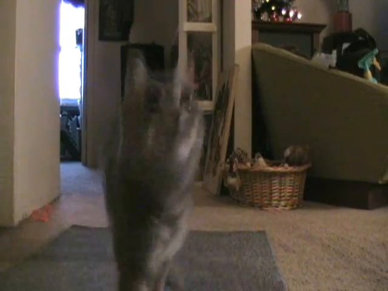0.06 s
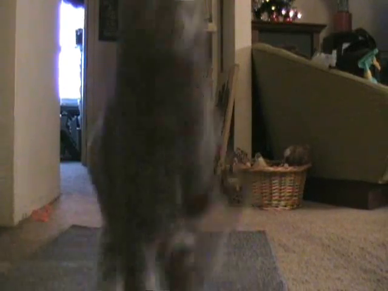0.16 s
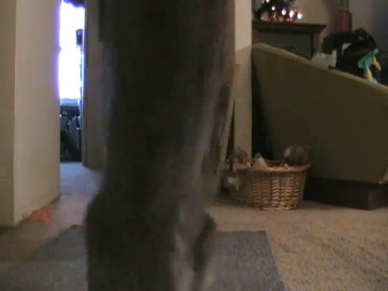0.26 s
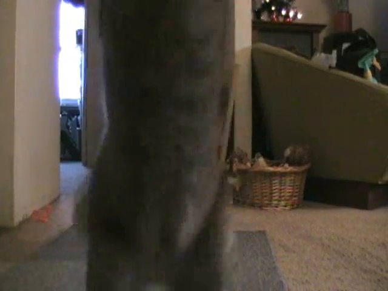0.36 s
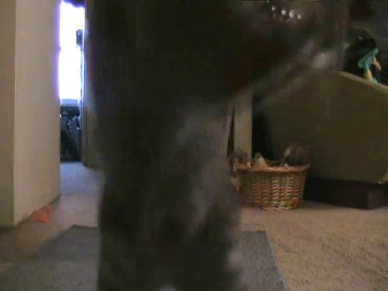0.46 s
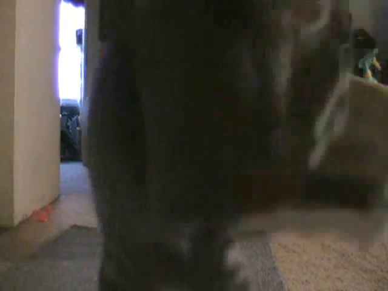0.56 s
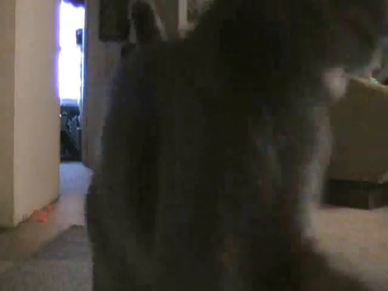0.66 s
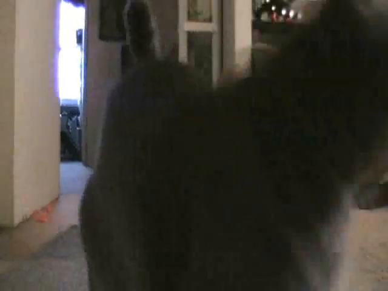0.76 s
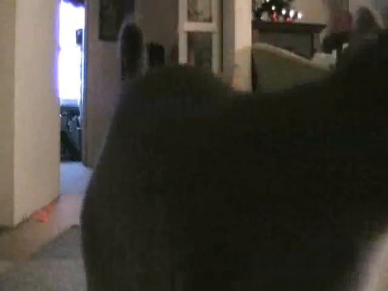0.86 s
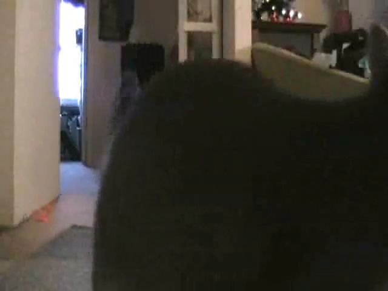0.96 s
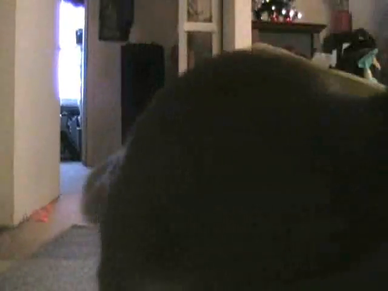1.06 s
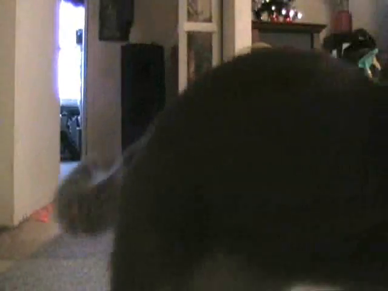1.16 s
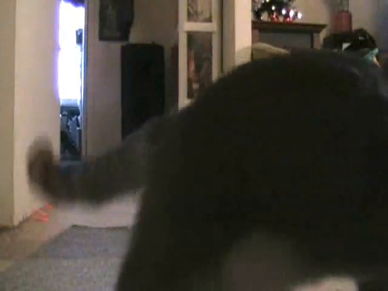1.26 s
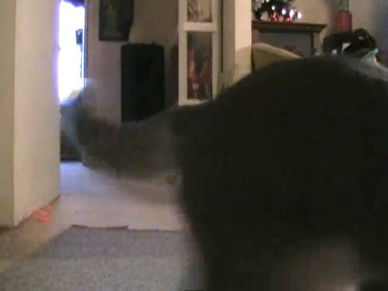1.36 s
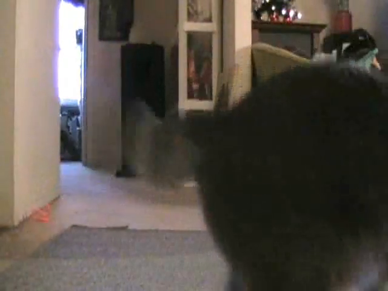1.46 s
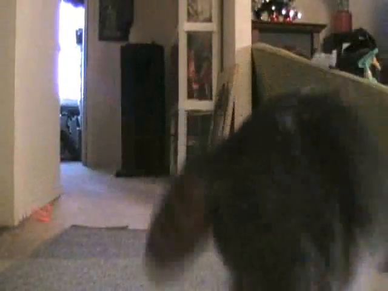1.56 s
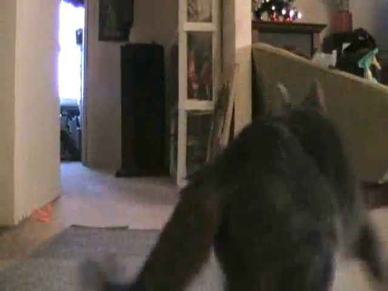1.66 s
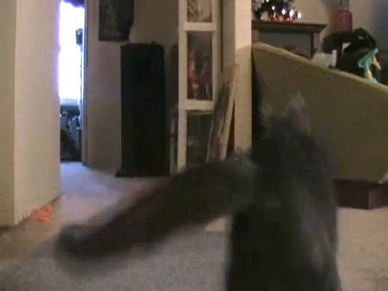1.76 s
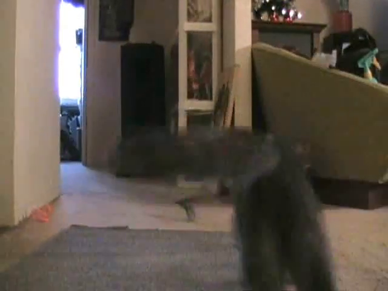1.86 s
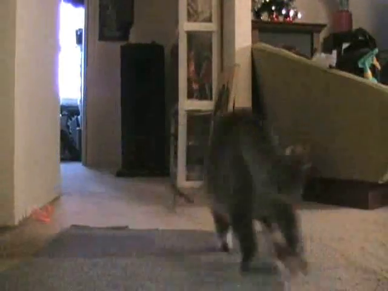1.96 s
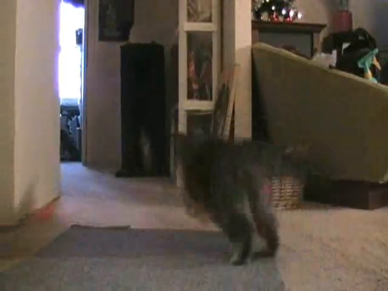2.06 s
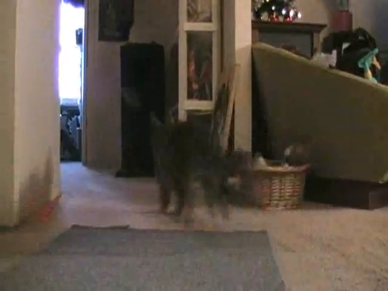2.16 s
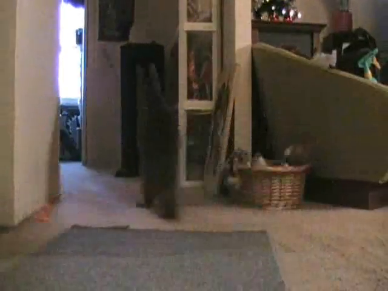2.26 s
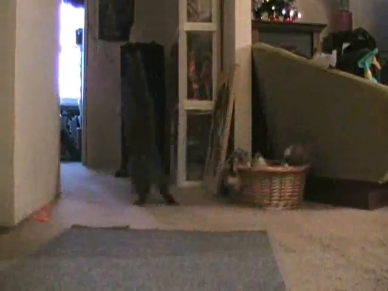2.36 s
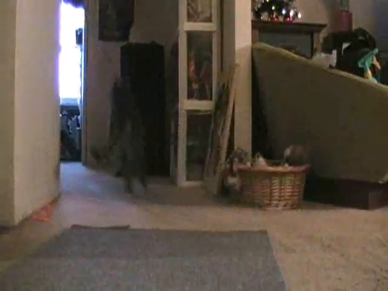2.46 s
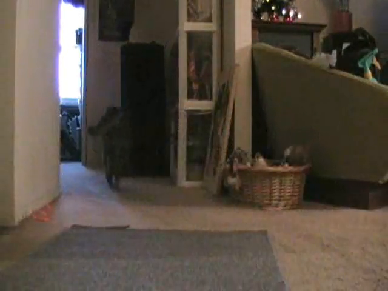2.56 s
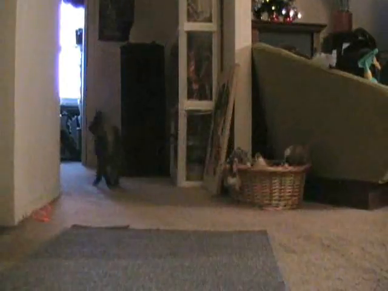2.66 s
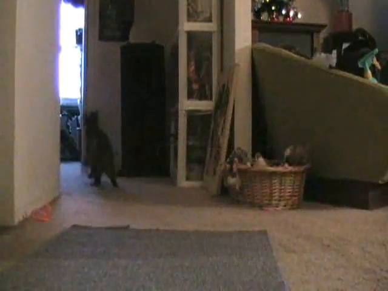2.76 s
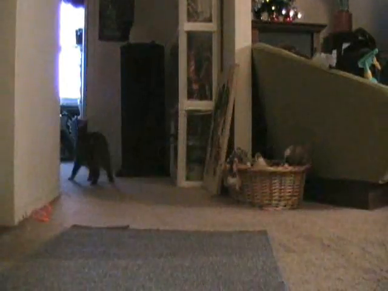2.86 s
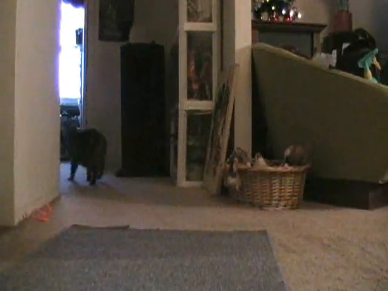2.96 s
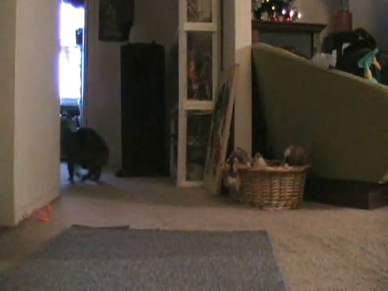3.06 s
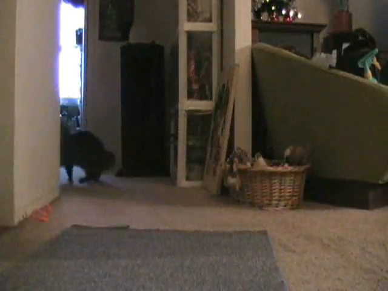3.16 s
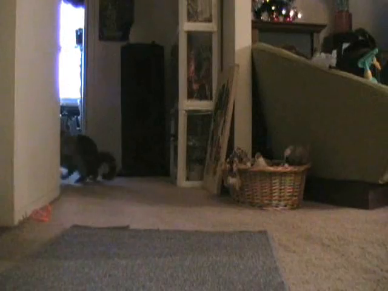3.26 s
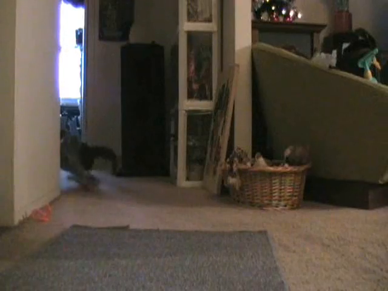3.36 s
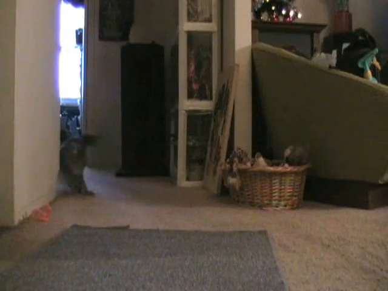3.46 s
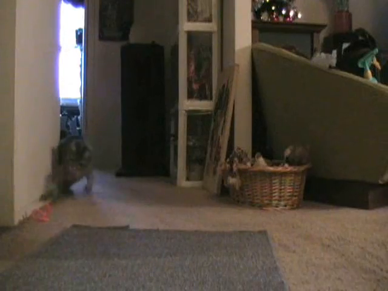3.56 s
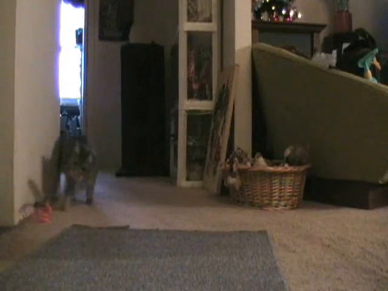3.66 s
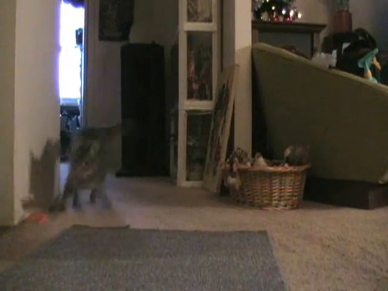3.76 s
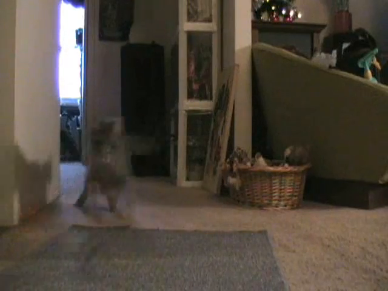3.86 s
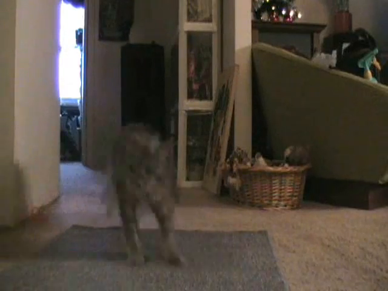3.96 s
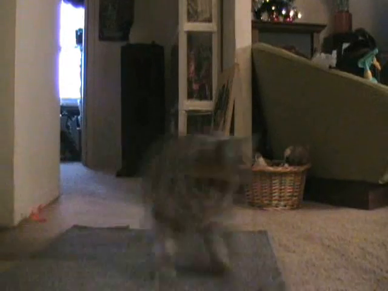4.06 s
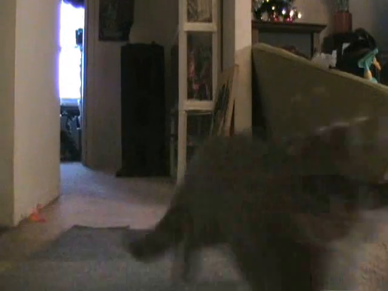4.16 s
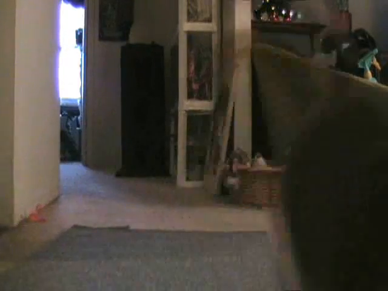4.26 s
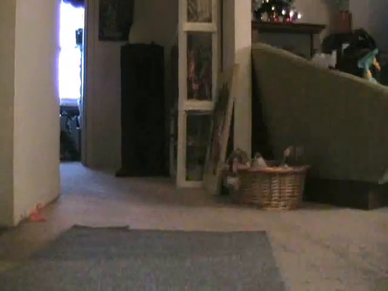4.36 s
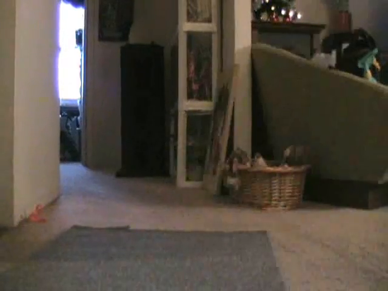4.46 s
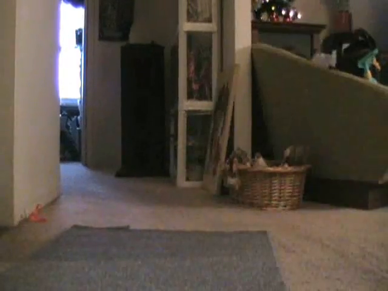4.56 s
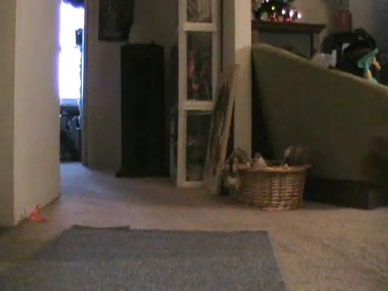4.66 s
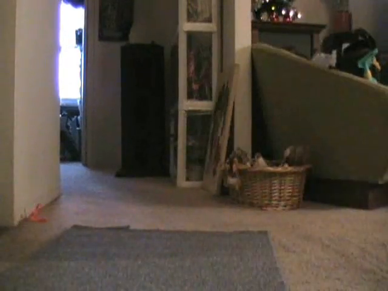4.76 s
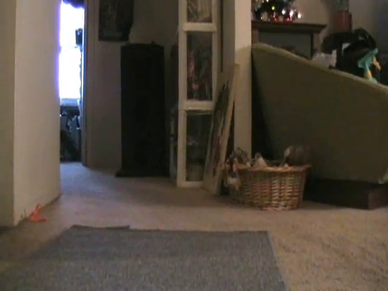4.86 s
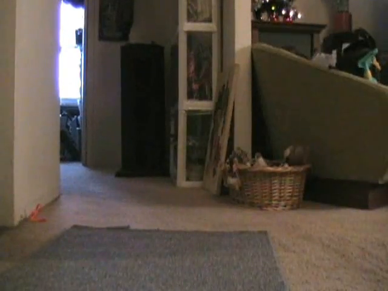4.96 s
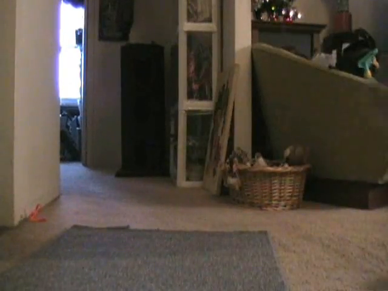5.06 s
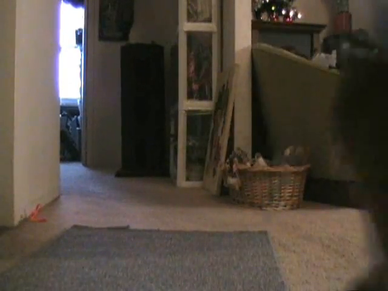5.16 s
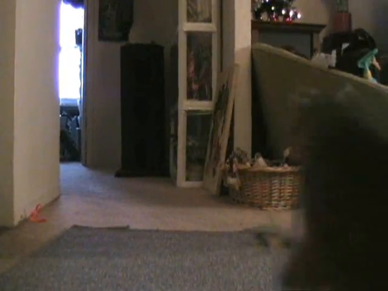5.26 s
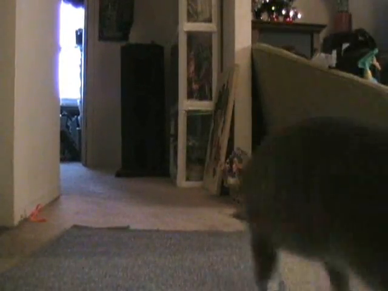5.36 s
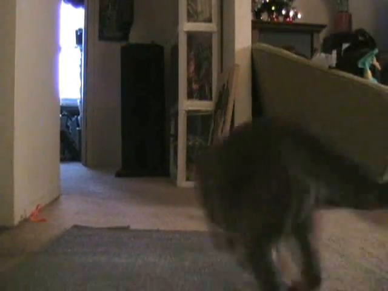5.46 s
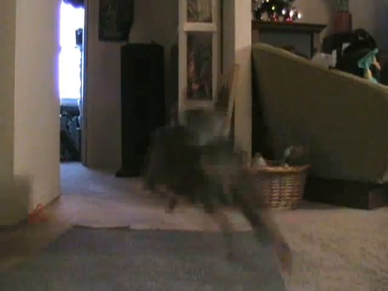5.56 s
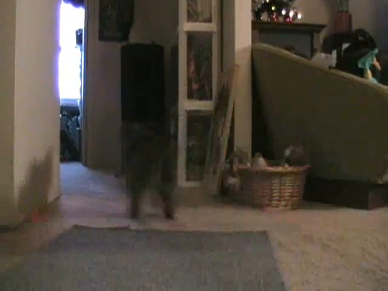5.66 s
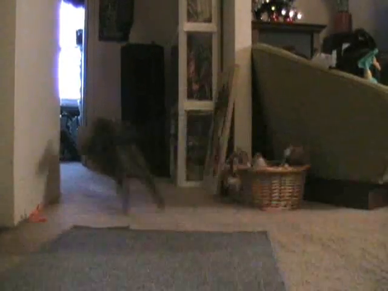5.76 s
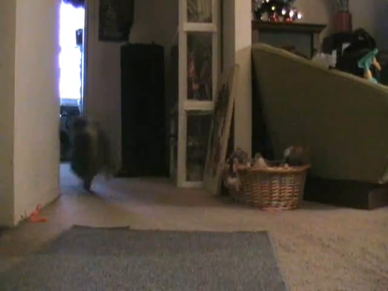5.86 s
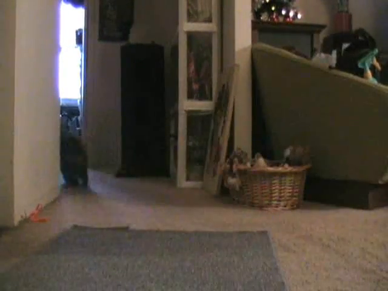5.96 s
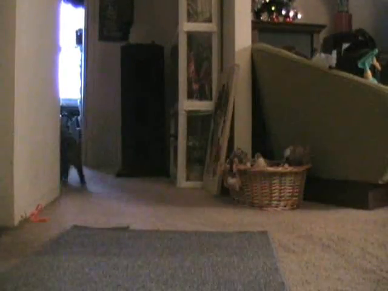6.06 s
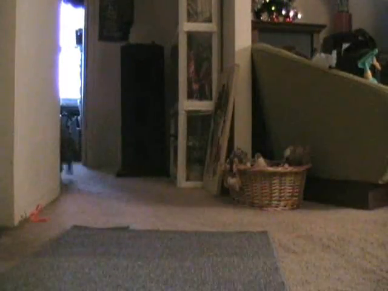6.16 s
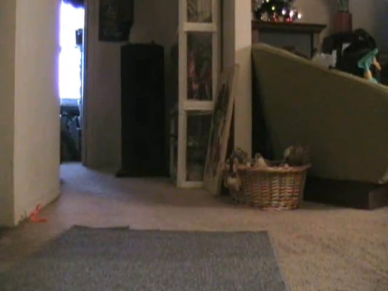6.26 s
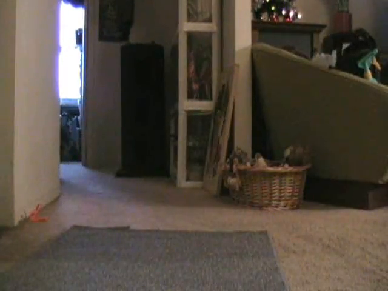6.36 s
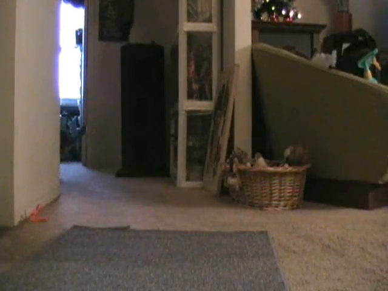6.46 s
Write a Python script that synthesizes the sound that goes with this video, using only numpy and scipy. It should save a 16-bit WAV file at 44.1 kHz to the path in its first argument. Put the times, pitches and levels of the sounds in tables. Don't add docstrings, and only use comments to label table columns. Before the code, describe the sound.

A small carpeted living room, heard from a camera lying on the floorboards, with low unsteady room tone, faint motor hum and thin high whine throughout. At 0.3 s a soft paw press leads into crisp claw swats, a bright ringing snap at 0.4 and the sharpest cluster of clacks around 0.63, with brief skids and a low bump at 0.8. Near quiet follows until small steps and scuffs at 1.65 to 2.0, then a patter of dull woody thumps at 2.2 to 2.45 and a soft one at 2.66. After a lull, a dash starts at 3.4, with hard pushes and rough rubbing at 3.55 to 3.65. Quick paws from 4.08 build to a heavy pounce at 4.3, jolting the camera, and a deep landing at 4.43, with turning scuffs to 4.75. A pause, then claw snaps and galloping thuds from 5.3 fade into softer pads until about 6.15, leaving the hum.

```python
import sys
import numpy as np
from scipy import signal
from scipy.fft import rfft, irfft, next_fast_len
from scipy.io import wavfile
from scipy.ndimage import uniform_filter1d

SR = 44100
rng = np.random.default_rng(int(sys.argv[2]) if len(sys.argv) > 2 else 0)


def put_to_file(sound):
    columns = np.atleast_2d(sound).T
    safe = np.clip(columns, -1, 1)
    whole_steps = np.round(safe * 32767)
    wavfile.write(sys.argv[1], SR, whole_steps.astype(np.int16))


def decibels_to_gain(level_db):
    exponent = np.asarray(level_db, float) / 20
    return 10 ** exponent


N = 287973


def rms_one(x):
    return x / np.sqrt(np.mean(x ** 2) + 1e-20)


def add(track, at_s, sound):
    i = round(at_s * SR)
    track[..., i:i + sound.shape[-1]] += sound[..., :N - i]


def coloured(x, points):
    size = next_fast_len(x.shape[-1])
    hz = np.maximum(np.fft.rfftfreq(size, 1 / SR), 1)
    table = np.array(points)
    gain_db = np.interp(np.log(hz), np.log(table[:, 0]), table[:, 1])
    return irfft(rfft(x, size) * decibels_to_gain(gain_db), size)[..., :x.shape[-1]]


def resonate(x, hz, width_hz):
    r = np.exp(-np.pi * width_hz / SR)
    zeros = np.array([1, 0, -1]) * (1 - r * r) / 2
    return signal.lfilter(zeros, [1, -2 * r * np.cos(2 * np.pi * hz / SR), r * r], x)


def ringing_band(noise, hz, width_hz):
    return resonate(resonate(noise, hz, width_hz), hz, width_hz)


def filtered(x, order, hz, kind):
    return signal.sosfilt(signal.butter(order, hz, kind, fs=SR, output="sos"), x)


def drift(rate):
    knots = rng.standard_normal(800)
    return np.interp(np.arange(N) / SR * rate, np.arange(800), knots)


# toe_peak_s [s], toe_db [dB], toe_pitch_hz [Hz], heel_db [dB], heel_pitch_hz [Hz]
PAW_ROLLS = [(0.31, -30.5, 198, -32.5, 97.5), (1.657, -43, 430, -38, 225), (1.973, -30.5, 493, -31.5, 190),
             (2.234, -45, 250, -35, 148), (2.3765, -18, 280, -27, 222), (2.406, -26, 220, -20, 257),
             (2.663, -32.5, 196, -32, 148), (3.415, -34.5, 290, -33, 202), (3.544, -19.5, 478, -22.5, 188),
             (3.628, -17.5, 598, -23, 383), (4.085, -33, 165, -35, 121), (4.298, -18.5, 338, -14.5, 147.5),
             (4.553, -20, 360, -36, 179), (5.298, -30, 370, -33, 346), (5.353, -27, 300, -43, 250),
             (5.461, -28.5, 190, -33.5, 200), (5.95, -33, 465, -28.5, 226), (6.071, -27, 268, -27, 186)]
# peak_s [s], peak_db [dB], floor_pitch_hz [Hz]
PAW_TAPS = [(.344, -38, 100), (.384, -37.5, 470), (.41, -31, 480), (.618, -32.5, 372), (.637, -21.5, 505),
            (2.117, -31.5, 287), (2.271, -33, 278), (2.292, -29, 342), (2.434, -27, 164),
            (3.578, -31.5, 360), (3.671, -29, 360), (4.193, -22, 250), (4.211, -27.5, 258),
            (4.287, -21, 290), (4.358, -21, 383), (4.45, -45, 380), (4.468, -32, 170), (4.537, -31.5, 398),
            (5.415, -38, 300), (5.44, -23.5, 320), (5.536, -31, 470), (5.57, -24.5, 320),
            (5.717, -35.5, 224), (5.857, -34, 242), (5.974, -30, 150), (6.128, -34, 193), (6.154, -29, 187)]
# peak_s [s], peak_db [dB], floor_pitch_hz [Hz], contact_s [s]
BODY_LANDINGS = [(.529, -34, 141, 0.016), (0.659, -32.5, 83.4, 0.012), (.824, -22.5, 250, 0.0093),
                 (1.843, -36.5, 186, 0.014), (1.907, -33, 235, .012), (2.261, -38, 150, 0.018),
                 (3.735, -35, 241, 0.01), (4.242, -18.5, 211, .011), (4.4295, -11.5, 360, .024),
                 (4.4305, -17.5, 213, .025), (4.494, -32, 206, 0.0084), (4.734, -27.5, 211, 0.0079),
                 (5.587, -25.5, 196, 0.01406), (5.66, -33, 230, 0.012), (5.684, -38, 122, 0.0088),
                 (5.804, -32, 280, 0.0095), (5.829, -35.5, 157, 0.013), (6.022, -25.5, 196, 0.0078),
                 (6.107, -31, 332, 0.0073)]


def footfalls():
    heel_after_s, toe_contact_s, heel_contact_s, tap_contact_s = 0.01215, 0.00572, 0.0065, 0.00506
    toes = [(s, db, hz, toe_contact_s) for s, db, hz, _, _ in PAW_ROLLS]
    heels = [(s + heel_after_s, db, hz, heel_contact_s) for s, _, _, db, hz in PAW_ROLLS]
    taps = [(*row, tap_contact_s) for row in PAW_TAPS]
    presses = []
    for s, db, hz, contact_s in toes + heels + taps + BODY_LANDINGS:
        side_db = -11.5 - 6.5 * np.log2(hz / 200) + 0.2647 * (db + 38)
        presses.append((s, db, hz, contact_s, side_db))
    return presses


def thumps(rough=0.37, swings=1.304):
    out, t = np.zeros((2, N)), np.arange(5000) / SR
    for s, level_db, hz, contact_s, side_db in footfalls():
        noise = rng.standard_normal((2, 6000))
        half_s = (contact_s + swings / hz) / 2
        u = t / half_s - 1.3
        press = np.exp(-np.where(u < 0, 2.4, 1.5) * u ** 4)
        press = press + .04 * (u > 0) * np.exp(-t / 0.0091)
        phase = 2 * np.pi * hz * t + noise[0, 0] * 9
        pile = rms_one(ringing_band(noise, hz * 1.15, hz * 1.07)[:, 1000:])
        mid = press * ((1 - rough) * np.sin(phase) + rough * pile[0])
        side = press * (0.71 * np.cos(phase) + .45 * pile[1]) - .3 * mid
        add(out, s - 1.3 * half_s, decibels_to_gain(level_db) * np.array([mid, decibels_to_gain(side_db) * side]))
    return out


# pitch_hz [Hz], t60_s [s], level_db [dB]
BOARD_MODES = [(111, 0.2, -9.5), (169.4, 0.36, -6), (196, 0.62, -34), (250, 0.3, -16), (360, 0.11, -26),
               (470, 0.35, -10)]


def boards(thump):
    return sum(decibels_to_gain(level_db) * 2.5 * resonate(thump, hz, 3.0 / t60_s) for hz, t60_s, level_db in BOARD_MODES)


def snaps(claws, fuzz_db=-16, reach=2.73):
    out, t = np.zeros(N), np.arange(600) / SR
    for s, level_db, hz, cycles in claws:
        noise = rng.standard_normal(600)
        ring = np.cos(2 * np.pi * hz * t) * np.exp(-t * hz * 8.5 / cycles)
        rasp = decibels_to_gain(fuzz_db) * noise * np.exp(-t / .0012)
        snap = filtered(ring + rasp, 2, [hz / 8.2, min(hz * reach, 15000)], "band")
        add(out, s - .0002, 1.15 * np.sign(noise[0]) * decibels_to_gain(level_db) * snap)
    return out


# peak_s [s], peak_db [dB], pitch_hz [Hz], ring_cycles
SWATS = [(.349, -30, 4540, 5.4), (.3822, -20, 6040, 1.2), (.4096, -3, 3500, 8.0),
         (.4117, -4, 3450, 9.0), (.415, -16, 3500, 2.0), (.4436, -26, 5030, 1.6),
         (.4955, -33, 3030, 2.5), (.5712, -14, 4070, 1.2), (.6182, 1, 3360, 0.48),
         (.6253, -13, 4000, 1.7), (.6282, -8, 5400, 1.4), (.6349, 7, 2060, 0.99), (.6438, 0, 4100, 1.8),
         (.646, -5, 3750, 4.6), (.652, -23, 3500, 1.8), (.661, -12, 1930, 1.2),
         (4.3054, -4.5, 2680, 0.95)]
# peak_s [s], peak_db [dB], pitch_hz [Hz]
RUN_SNAPS = [(1.9724, -21, 1920), (1.9744, -31, 2480), (1.9844, -18.5, 2100), (2.1947, -28, 2190),
             (2.2186, -26, 2230), (2.235, -22, 1740), (2.276, -24, 1500), (3.577, -26, 1820),
             (4.046, -25, 2210), (4.1964, -22, 1330), (4.296, -25, 1360), (5.567, -22, 1000),
             (0.3087, -41, 1090), (5.946, -36, 900), (4.3075, -10, 1290), (4.311, -8, 1600),
             (4.3345, -31, 1530), (5.1367, -27, 1840), (5.412, -10.5, 3220), (5.4379, -9, 2320),
             (5.454, -23, 1880), (5.4829, -23.5, 2480), (5.5352, -17, 1720), (5.547, -34, 1340),
             (5.5746, -21, 2900), (5.58, -32, 1730), (5.6557, -24, 1770)]
# peak_s [s], peak_db [dB], pitch_hz [Hz]
BACKING_KNOCKS = [
    (3.552, -19.5, 1770),
    (3.6263, -18.5, 1800),
    (4.3079, -8, 1130),
    (4.358, -18, 1310),
    (4.5507, -22, 1270),
    (5.3515, -30, 1010),
]


def claws():
    run = [(*row, 1.7) for row in RUN_SNAPS]
    knocks = [(*row, 14.2) for row in BACKING_KNOCKS]
    return snaps(SWATS + run + knocks)


# peak_s [s], peak_db
# [dB], pitch_hz [Hz], ring_cycles [cycles]
SMALL_CATCHES_AND_TICKS = [(.4096, -6, 10500, 6.0), (3.5501, -12, 1500, 1.5), (3.5503, -17, 9500, 3.3),
                           (3.563, -19, 1600, 1.5), (3.634, -19, 1100, 3.0), (4.1925, -25, 2100, 3.0),
                           (4.209, -27, 3800, 4.0), (4.3068, -6, 3220, 1.5), (2.2175, -24.5, 850, 4.5),
                           (2.372, -36, 900, 2.5), (2.382, -31, 620, 3.0), (2.4175, -31, 1880, 4.0),
                           (5.567, -22, 600, 3.5), (5.945, -28, 700, 3.3), (6.016, -24, 750, 3.0),
                           (6.022, -26.5, 1200, 2.9), (6.064, -30, 602, 3.2), (.309, -35, 700, 2.7),
                           (5.8415, -23, 3700, 1.5), (4.5525, -19, 1500, 2.5), (4.3695, -28, 1200, 2.5),
                           (.6365, -10, 1400, 4.0), (.5915, -28, 2800, 2.5), (5.4122, -22, 11000, 1.5),
                           (5.4379, -22, 11000, 1.5), (6.035, -30, 900, 3.0), (6.09, -30, 900, 3.0),
                           (6.12, -31, 1000, 3.0), (5.675, -31, 1500, 2.5), (3.655, -21, 1700, 3.0),
                           (3.6265, -15, 900, 2.0), (4.215, -27, 3800, 3.0), (4.2, -26, 4500, 2.0),
                           (1.99, -30, 2600, 2.0), (1.979, -30, 3200, 2.0), (4.3072, -16, 11500, 2.0),
                           (.3836, -24, 3000, 2.0), (.391, -28, 9000, 1.5), (.4117, -10, 11000, 4.0),
               (.4131, -14, 9500, 4.0), (.4146, -13, 10000, 5.0), (.4235, -22, 12000, 4.0),
               (.4436, -26, 10500, 3.0), (3.5185, -29, 12500, 6.0), (3.526, -29, 3000, 1.2),
               (3.5345, -28, 11500, 3.0), (3.539, -28, 11500, 3.0), (3.5425, -17, 600, 2.5),
               (3.563, -28, 11000, 1.5), (3.576, -33, 10500, 1.5), (3.6363, -12, 1100, 2.5),
               (3.6345, -14, 900, 2.0), (3.643, -17, 900, 2.5), (3.656, -17, 1000, 2.5),
               (3.6605, -20, 1500, 2.0), (4.045, -33, 12000, 2.0), (4.154, -32, 9000, 1.2),
               (4.197, -18, 900, 2.5), (4.2105, -24, 1900, 2.5), (4.222, -27, 1000, 2.5),
               (4.241, -30, 2000, 2.0), (4.422, -24, 2700, 2.5), (4.431, -26, 2500, 2.5),
               (4.552, -18, 500, 1.5), (5.3, -34, 8000, 1.5), (5.358, -32, 10000, 3.0),
               (5.4465, -30, 12500, 1.5), (5.527, -30, 12500, 2.0), (5.535, -30, 10000, 1.5),
               (5.948, -33, 2000, 3.0), (5.956, -32, 950, 2.5), (5.968, -28, 500, 2.0),
               (6.0315, -27, 450, 2.0), (6.0405, -29, 500, 2.0), (6.084, -33, 1500, 2.0),
               (6.152, -30, 450, 2.5), (2.382, -23, 1000, 2.0), (5.8418, -27, 11500, 2.0),
               (6.022, -30, 1600, 2.0), (6.107, -31, 1300, 2.0), (6.166, -33, 1400, 2.0),
               (.309, -28, 1200, 1.5)]


def catches_and_ticks():
    return snaps(SMALL_CATCHES_AND_TICKS)


# start_s [s], level_db [dB], rise_s [s], fade_t60_s [s], centre_hz [Hz]
SLOW_DRAGS = [(.529, -34, 0.074, 0.19, 2830), (1.8, -55, 0.065, .99, 4000),
              (1.928, -47.5, .021, 0.19, 1500), (2.04, -53.5, 0.027, .51, 1400), (2.15, -44, 0.029, 1, 990),
              (2.66, -52, 0.0093, 0.46, 1215), (3.526, -31.5, 0.019, 0.27, 930),
              (3.672, -45, 0.045, 0.31, 6000), (4.225, -46, .036, 0.2, 1800),
              (4.45, -41, 0.028, 0.73, 1800), (5.25, -45, 0.04, 0.32, 900), (6.1, -41, .021, 0.4, 670),
              (3.522, -44, 0.0059, 0.35, 11500), (4.419, -56, 0.027, 0.5, 13100),
              (5.401, -55, 0.016, 0.62, 11500)]
# start_s [s], level_db [dB], fade_t60_s [s], centre_hz [Hz]
PAD_SKIDS = [(.30, -40.5, 0.17, 586), (.38, -40.5, 0.79, 5900), (0.411, -34, 0.22, 3800),
             (0.406, -23, 0.072, 10800), (.619, -27, 0.23, 3460), (0.641, -24, 0.1, 2380),
             (1.65, -47, 0.16, 510), (1.972, -36.5, 0.19, 1460), (2.285, -37, 0.18, 650),
             (2.37, -36, 0.43, 545), (2.41, -38, 0.19, 740), (3.41, -46.5, 0.19, 2580),
             (3.624, -27, 0.35, 980), (4.08, -44, 0.15, 990), (4.154, -38, 0.59, 1700),
             (4.19, -31, 0.3, 840), (4.28, -35, 0.11, 900), (4.302, -26, 0.026, 2500),
             (4.357, -39, .11, 805), (4.415, -28.5, 0.27, 1210), (4.548, -33, 0.19, 905),
             (5.351, -41, 0.13, 700), (5.408, -35.5, 0.093, 990), (5.437, -37, 0.19, 1180),
             (5.534, -37.5, 0.27, 840), (5.566, -39, 0.13, 1000), (5.651, -36, 0.12, 1120),
             (5.839, -36.5, 0.46, 3370), (5.946, -38, 0.33, 700), (6.015, -39, 0.6, 657)]


def scuffs(grain_db=3.0, per_s=2600, hiss=0.65, lumps_db=1.5, ripple_db=1.5, dulling=1.14):
    out, t = np.zeros(N), np.arange(16384) / SR
    skids = [(s, db, 0.0048, fade_s, hz) for s, db, fade_s, hz in PAD_SKIDS]
    for s, level_db, rise_s, fade_s, hz in SLOW_DRAGS + skids:
        sizes = decibels_to_gain(grain_db * np.minimum(rng.exponential(1, t.size), 4)) * rng.choice([-1, 1], t.size)
        grains = rms_one(sizes * (rng.random(t.size) < per_s / SR))
        fibres = grains + hiss * rng.standard_normal(t.size)
        slope_db = min(-9 + 4 * np.log2(hz / 1000), -4.0)
        colour = [(hz / 16, -26.0), (hz / 3, -7.0), (hz, 0), (hz * 16, 4 * slope_db)]
        ripple = np.transpose([np.geomspace(200, 16000, 30), ripple_db * rng.standard_normal(30)])
        drag = rms_one(coloured(coloured(fibres, colour), ripple))
        body = coloured(drag, [(hz, 0), (hz * 4, -24.0)])
        rise = np.minimum(t / rise_s, 1)
        fade = decibels_to_gain(-60 * np.maximum(t - rise_s, 0) / max(fade_s, .03))
        add(out, s, decibels_to_gain(level_db) * rise * (body * fade + (drag - body) * fade ** dulling))
    return out * decibels_to_gain(lumps_db * drift(97))


# start_s [s], level_db [dB], fade_t60_s [s], centre_hz [Hz], width_hz [Hz]
HARD_RUBS = [(.411, -30, .12, 3200, 900), (.632, -26, 0.13, 1600, 900), (3.54, -33, 0.13, 1000, 500),
             (3.630, -25.5, 0.3, 1270, 1210), (3.645, -34.5, 0.25, 2400, 1210),
             (4.19, -32, 0.086, 2080, 900), (4.206, -32, .1, 900, 500), (4.255, -44, .3, 2000, 300),
             (4.305, -21, 0.036, 1210, 900), (5.349, -31, .08, 990, 200), (5.84, -46.5, 0.35, 2200, 1200),
             (2.286, -39, .15, 750, 400), (.4088, -30, .04, 4900, 250), (3.538, -28, .2, 560, 300),
             (3.625, -27, .15, 750, 400), (4.184, -31, .25, 560, 300), (4.42, -47, .8, 13200, 1200),
             (4.535, -45, .15, 11500, 2000), (3.636, -42, .1, 9500, 1200), (5.349, -52, .15, 12500, 1200),
             (3.517, -42, .03, 11500, 2500), (4.48, -43, .4, 3500, 2500), (6.06, -36, .15, 560, 300),
             (5.958, -37, .12, 550, 300), (4.03, -54, .3, 12800, 1500), (3.709, -47, .2, 11200, 1500),
             (3.55, -51, .6, 13200, 800), (3.675, -50, .5, 10500, 3000), (3.655, -47, .4, 5200, 2000),
             (4.155, -50, .6, 10200, 2500), (5.95, -51, .3, 3200, 1200), (4.495, -42, .5, 3500, 1800),
             (5.28, -55, .3, 8000, 3000), (5.839, -43, .4, 11500, 2500), (4.44, -44, .6, 5000, 3000)]


def rubs(rise_s=0.0037, lumps_db=3.5):
    out, t = np.zeros(N), np.arange(12000) / SR
    for s, level_db, fade_s, hz, width_hz in HARD_RUBS:
        noise = rng.standard_normal((2, 12000))
        lumps = decibels_to_gain(lumps_db * rms_one(uniform_filter1d(noise[1], size=90)))
        band = rms_one(ringing_band(noise[0] * lumps, hz, width_hz))
        add(out, s, decibels_to_gain(level_db - 60 * t / fade_s) * np.minimum(t / rise_s, 1) * band)
    return out


# pitch_hz [Hz], gain_db [dB]
CAPSULE_COLOUR = [(4500, -0.5), (5300, -1), (6700, -6), (8400, 0.5), (10500, 1), (13500, 0.5)]


def close_pile():
    return coloured(claws() + scuffs() + catches_and_ticks() + rubs(), CAPSULE_COLOUR)


# start_s [s], peak_db [dB], pitch_hz [Hz], t60_s [s]
CAMERA_JOLTS = [
    (4.306, -2.5, 135, 0.048),
    (4.322, -23, 62, 0.19),
    (4.421, -19, 201, 0.091),
    (5.1, -36, 40, 0.18),
]


def jolts():
    out, t = np.zeros(N), np.arange(16000) / SR
    for s, level_db, hz, t60_s in CAMERA_JOLTS:
        onset = np.minimum(t * hz * 0.91, 1) ** 2
        add(out, s, -decibels_to_gain(level_db - 60 * t / t60_s) * onset * np.sin(2 * np.pi * hz * t) * 3.2)
    return out


def room(x, t60_s=0.2, wall_cut_hz=1300):
    size = next_fast_len(N + SR)
    hz = np.fft.rfftfreq(size, 1 / SR)
    dull, spectrum, out = 1 / (1 + 1j * hz / wall_cut_hz), rfft(x, size), []
    for lags_s in rng.uniform(.008, .03, (2, 6)):
        loops = [dull * decibels_to_gain(-60 * lag / t60_s) * np.exp(-2j * np.pi * hz * lag) for lag in lags_s]
        echo = sum((-1) ** k * g / (1 - g) for k, g in enumerate(loops))
        out.append(irfft(spectrum * echo, size)[:N])
    return np.array(out)


# pitch_hz [Hz], level_db [dB]
WHINE_ORDERS = [(11988, -84), (13187, -83), (13487, -80)]


def motor(turn_hz=299.7, whine_db=-67, rasp_db=-62, throb=0.47):
    turns = np.arange(N) / SR * turn_hz
    pulses = np.diff(np.floor(turns), prepend=0)
    whine = filtered(pulses, 1, [2500, 16000], "band")
    beat = 1 + throb * np.cos(2 * np.pi * turns) + 0.14 * np.cos(4 * np.pi * turns)
    rasp = filtered(rng.standard_normal(N), 2, [5820, 6300], "band") * beat
    tops = sum(decibels_to_gain(db) * np.sin(2 * np.pi * round(hz / turn_hz) * turns) for hz, db in WHINE_ORDERS)
    return tops + decibels_to_gain(whine_db) * rms_one(whine) + decibels_to_gain(rasp_db) * rms_one(rasp)


# centre_hz [Hz], width_hz [Hz], level_db [dB]
HUM_BANDS = [(118, 13.5, -60.5), (188, 13, -69), (938.4, 33, -66.5), (11050, 300, -76)]


def hum():
    noise = rng.standard_normal(N)
    return sum(decibels_to_gain(level_db) * rms_one(ringing_band(noise, hz, width_hz)) for hz, width_hz, level_db in HUM_BANDS)


# time_s [s], above_rest_db [dB]
FLOOR_SHAKE = [(0, 0), (.35, 7), (.9, 3), (1.5, 0.3), (2.25, 8.5), (3.0, -2), (3.7, 5), (4.0, 8),
               (4.33, 22), (4.7, -2), (5.301, 10), (6.05, 7), (6.53, 0)]


def floor_shake_db():
    return np.interp(np.arange(N) / SR, *np.transpose(FLOOR_SHAKE))


def rumble(shake_db):
    noise = rng.standard_normal(N)
    low = coloured(noise, [(20, -20), (50, -13), (85, 1.5), (125, -1), (200, -20), (400, -49)])
    return decibels_to_gain(-59.5 + shake_db + 3.2 * drift(6.8)) * rms_one(low)


# pitch_hz [Hz], density_db [dB per Hz]
TONE_MID = [(15, -57), (25, -16), (91, -14), (101, -15), (121, 4), (154, -13.5), (190, -5.5), (267, -15.5),
            (305, -11.5), (330, -18), (544, -16), (689, -17.5), (4240, -29), (6130, -32), (13500, -39)]
# pitch_hz [Hz], density_db [dB per Hz]
TONE_SIDE = [(12, -40), (20, -16), (70, 2.5), (128, 0.5), (159, -2), (203, -4), (860, -23), (959, -19.5),
             (1570, -29.5), (2300, -25), (2490, -28.5), (6290, -36), (13500, -35)]


def room_tone(shake_db, flicker_db=1.16):
    noise = rng.standard_normal((2, N))
    mid_db = -49 + 0.32 * shake_db + flicker_db * drift(9.6)
    side_db = -42.5 + .12 * shake_db + flicker_db * drift(5.17)
    mid = filtered(coloured(noise[0], TONE_MID), 2, 140, "high")
    side = coloured(noise[1], TONE_SIDE)
    return np.array([decibels_to_gain(mid_db) * rms_one(mid), decibels_to_gain(side_db) * rms_one(side)])


def background():
    shake_db = floor_shake_db()
    mid, side = room_tone(shake_db)
    return np.array([mid + rumble(shake_db) + hum() + motor(), side])


def scene():
    paws, pile, floor = thumps(), close_pile(), background()
    direct = paws[0] + pile + boards(paws[0])
    wet = room(direct)
    mid = direct + decibels_to_gain(-19) * wet[0] + floor[0]
    side = paws[1] + jolts() + floor[1] + decibels_to_gain(-22.0) * wet[1]
    side = side + decibels_to_gain(-6.5) * np.gradient(pile) - decibels_to_gain(-29.0) * pile - decibels_to_gain(-50) * mid
    return np.array([mid + side, mid - side])


# pitch_hz [Hz], level_db [dB per bin]
FAINT_LIMIT = [(3000, -110), (5500, -100), (8000, -93), (9900, -103), (10300, -87), (10700, -103.5),
               (11500, -89.5), (12100, -85), (13500, -79), (14000, -74)]


def lose_faint_treble(x, wander_db=7.0, masking=0.5, quiet_db=-62, sudden=6.0):
    x = signal.sosfilt(signal.ellip(10, .5, 50, 14050, fs=SR, output="sos"), x)
    hz, s, bins = signal.stft(x, SR, nperseg=2048)
    table, power = np.array(FAINT_LIMIT), np.abs(bins) ** 2
    chance = uniform_filter1d(rng.standard_normal((65, len(s))), size=4, axis=1) * 2
    loud_db = 10 * np.log10(power[:, hz > 3000].sum(axis=(0, 1)) + 1e-12)
    limit = np.interp(hz, table[:, 0], table[:, 1], left=-200)[:, None]
    limit = limit + masking * np.maximum(loud_db - quiet_db, 0)
    limit = limit + wander_db * np.repeat(chance, 16, axis=0)[:len(hz)]
    level = uniform_filter1d(uniform_filter1d(power.mean(axis=0), size=2, axis=0), size=4, axis=1)
    thinned = signal.istft(bins * (level > decibels_to_gain(2 * limit)), SR)[1][:, :N]
    edge = np.gradient(x.sum(axis=0)) ** 2
    jump = uniform_filter1d(edge, size=128) / (uniform_filter1d(edge, size=2048) + 1e-12)
    return thinned + uniform_filter1d(np.clip(jump / sudden - 1, 0, 1), size=64) * (x - thinned)


def roll_off(x):
    return signal.sosfilt(signal.butter(12, 13990, fs=SR, output="sos"), x)


def record(dry):
    rounded = 0.97 * np.tanh(dry / 0.93)
    mix = lose_faint_treble(rounded)
    return roll_off(mix)


dry = scene()
out = record(dry)
put_to_file(out)
```